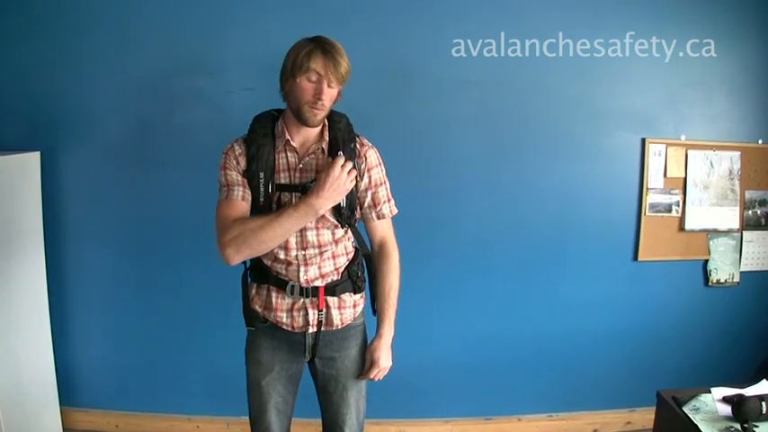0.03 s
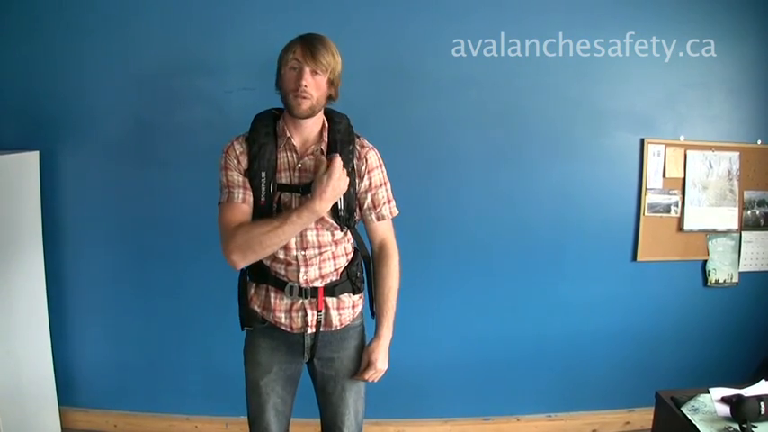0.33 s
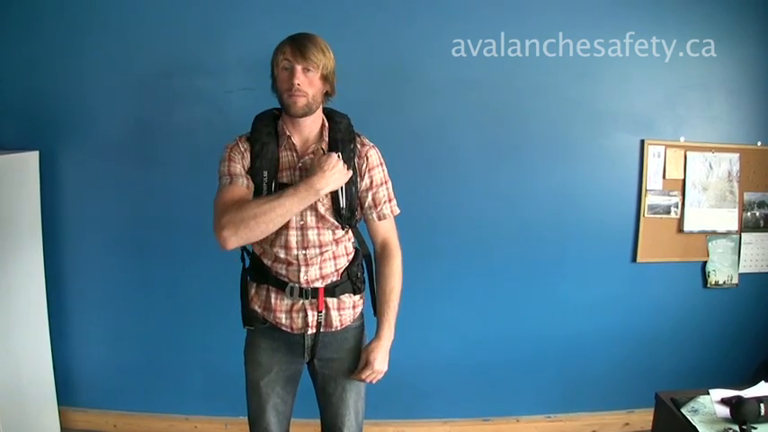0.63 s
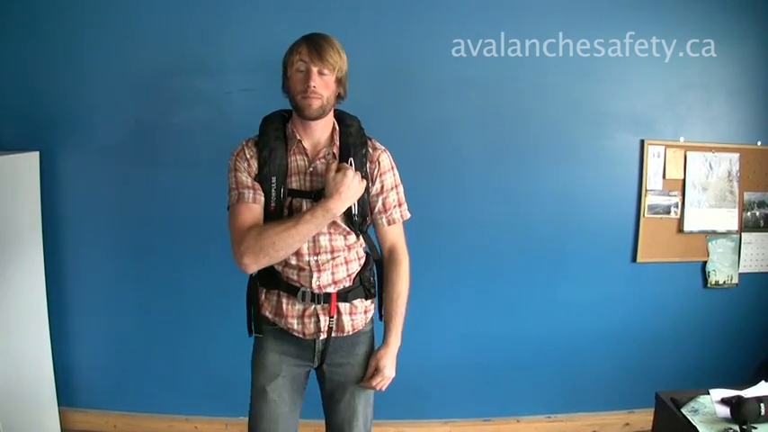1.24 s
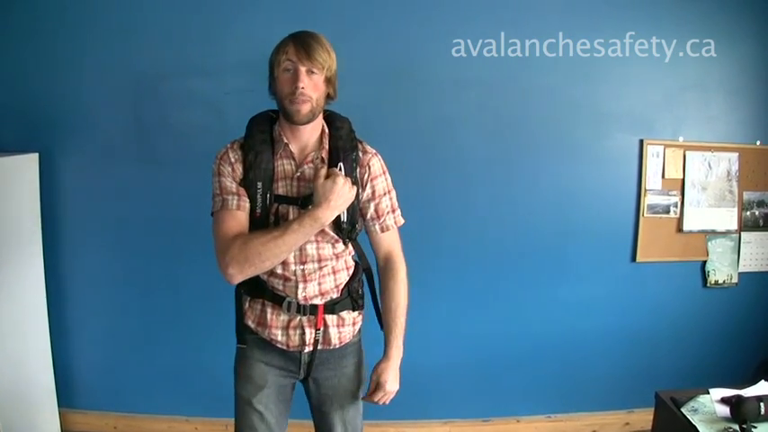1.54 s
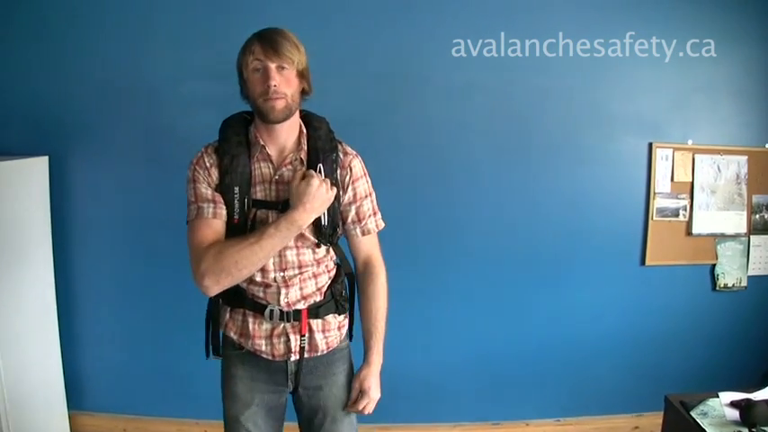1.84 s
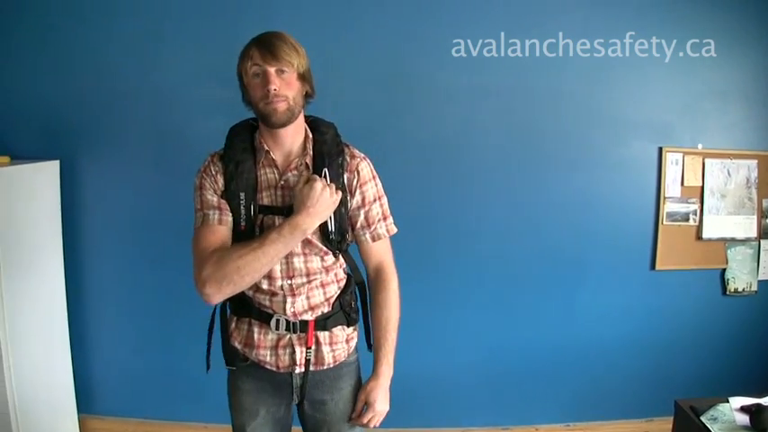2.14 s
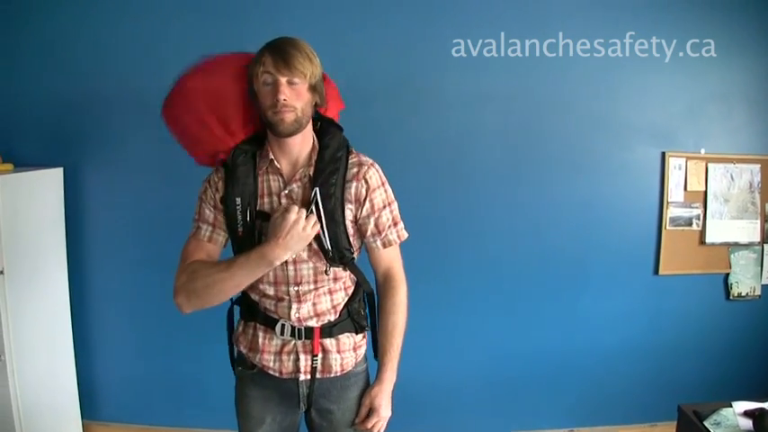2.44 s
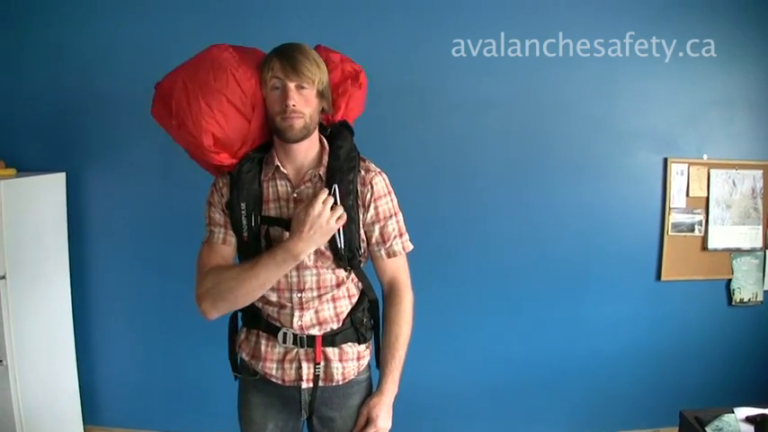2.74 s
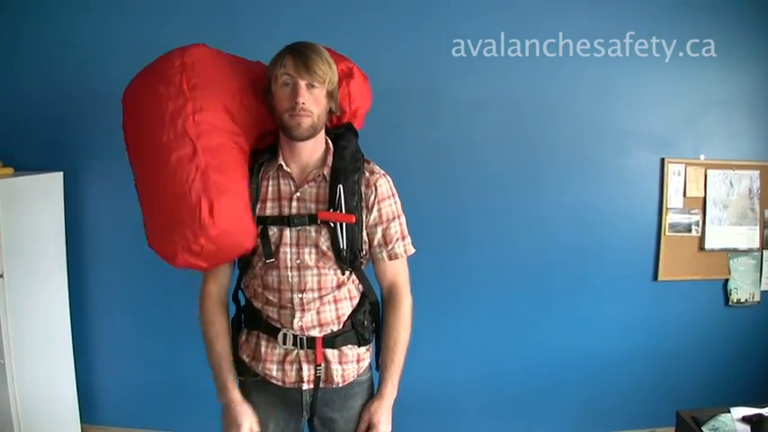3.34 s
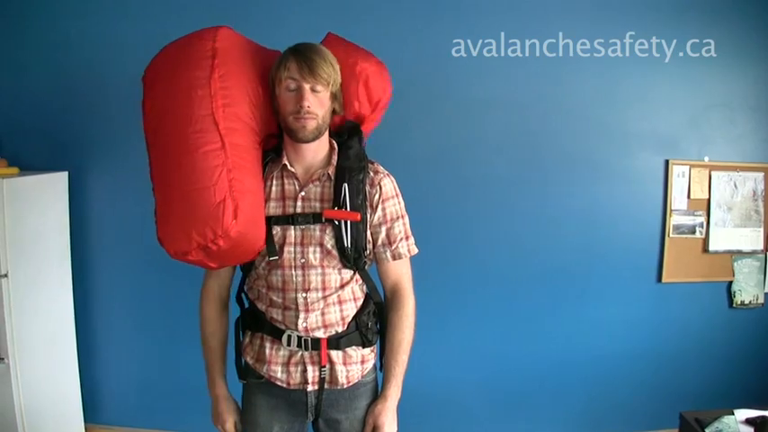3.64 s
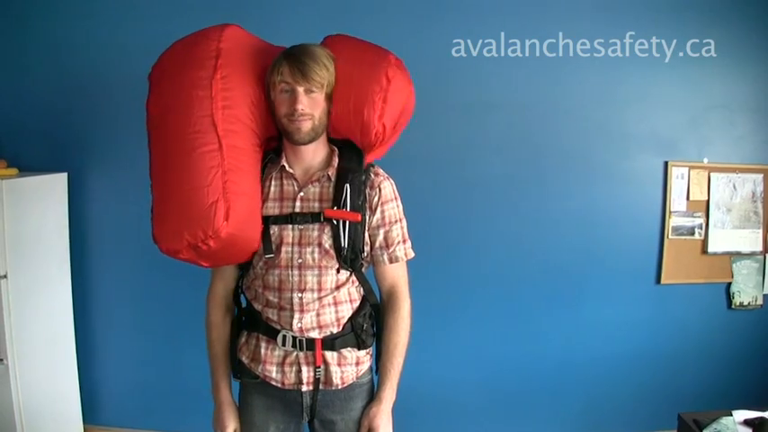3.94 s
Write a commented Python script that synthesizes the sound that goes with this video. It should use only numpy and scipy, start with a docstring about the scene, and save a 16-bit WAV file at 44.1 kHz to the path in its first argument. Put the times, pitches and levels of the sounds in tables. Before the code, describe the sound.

Quiet strap rustles, then a backpack airbag thumps open and inflates with a loud hiss.

```python
"""A quiet room with buzzing lights, where an avalanche backpack fires. Straps rustle and the handle knocks; the
trigger cable is pulled, rubbing and then scraping in its sleeve. The pack bursts open with two thumps, the
first hard enough to clip, and gas rushes into the bags: the jet hisses on while the hollow resonance rises and
the low roar fades as they fill."""
import sys
import numpy as np
from scipy import signal
from scipy.fft import rfft, irfft, next_fast_len
from scipy.io import wavfile
from scipy.ndimage import uniform_filter1d, map_coordinates

SR = 44100
rng = np.random.default_rng(int(sys.argv[2]) if len(sys.argv) > 2 else 0)


def to_wav(s):
    """Save 16-bit WAV."""
    ch = np.atleast_2d(s).T  # columns
    pcm = np.round(np.clip(ch, -1, 1) * 32767)  # PCM
    wavfile.write(sys.argv[1], SR, pcm.astype(np.int16))


N = 176400
T = np.arange(N) / SR


def amp(db):
    """Decibels to gain."""
    return 10 ** (np.asarray(db) / 20)


def unit(x):
    """Scale to rms 1."""
    return x / np.sqrt(np.mean(x ** 2) + 1e-20)


def along(points, hz):
    """Read (Hz, value) points on a log frequency axis."""
    freqs, values = np.transpose(points)
    return np.interp(np.log(hz + 1), np.log(freqs + 1), values)


def curves(rows):
    """One automation curve for each column after the time."""
    times, *columns = np.transpose(rows)
    return [np.interp(T, times, column) for column in columns]


def wobble(per_s):
    """A smooth random curve with per_s knots a second."""
    return map_coordinates(rng.standard_normal(2048), [T * per_s], mode="wrap")


def filtered(x, response):
    """EQ x by a gain that depends on frequency."""
    size = next_fast_len(N + SR // 2)
    return irfft(rfft(x, size) * response(np.fft.rfftfreq(size, 1 / SR)), size)[..., :N]


def low_cut(x, hz):
    """Cut the deep bass from the knocks and thumps."""
    return signal.sosfilt(signal.butter(4, hz, "high", fs=SR, output="sos"), x)


def noise(colour):
    """Coloured noise of rms 1."""
    return unit(filtered(rng.standard_normal(N), lambda hz: amp(along(colour, hz))))


def grains(colour, per_s):
    """Friction texture: tiny random slips through an EQ, rms 1."""
    slips = (rng.random(N) < per_s / SR) * rng.standard_normal(N)
    return unit(filtered(slips, lambda hz: amp(along(colour, hz))))


def resonance(centre_hz, width_hz):
    """Turbulence ringing in one resonance, which may glide."""
    a, b = filtered(rng.standard_normal((2, N)), lambda hz: 1 / (1 + (hz / width_hz) ** 2) ** 2)
    phase = 2 * np.pi * np.cumsum(centre_hz * np.ones(N)) / SR
    return unit(a * np.cos(phase) + b * np.sin(phase))


def burst(start, attack, hold, t60):
    """Attack, hold and exponential release, all in seconds."""
    rise = np.clip((T - start) / attack + .5, 0, 1) ** 2
    return rise * amp(-60 * np.clip((T - start - hold) / t60, 0, 2))


def ring(start, modes):
    """Damped modes set going by one blow."""
    age = np.clip(T - start, 0, .5)
    return sum(amp(db - 60 * age / t60) * np.sin(2 * np.pi * hz * age) for hz, db, t60 in modes)


# Reverb decay. Each row: frequency in Hz, t60 in seconds.
ROOM_DECAY = [(100, 0.2), (600, 0.23), (3000, 1), (14000, 0.27)]
def room(x, tail_db=-12.5, wall_db=-15):
    """Add six slaps off near walls and a short tail."""
    hz, t, spectrum = signal.stft(rng.standard_normal(SR // 2), SR, nperseg=256)
    tail = signal.istft(spectrum * amp(-60 * t / along(ROOM_DECAY, hz)[:, None]), SR, nperseg=256)[1]
    impulse = amp(tail_db) * tail / np.linalg.norm(tail)
    delays = (rng.uniform(.002, .02, size=6) * SR).astype(int)
    impulse[delays] += amp(wall_db) * rng.choice([-1, 1], size=6)
    return x + signal.fftconvolve(x, impulse)[:N]


# EQ of the room air. Each row: frequency in Hz, gain in dB.
AIR_COLOUR = [(20, -7), (32, 13), (45, -10), (65, 3), (95, -11.5), (160, 2), (270, 3.5), (400, -6),
              (900, -16), (1700, -13), (4000, -15), (7000, -19.5), (11000, -21.5), (16000, -28)]
def room_tone(air_db=-50, hum_db=-58, hum_hz=29.8):
    """A soft bed of air over a deep hum."""
    return amp(air_db) * noise(AIR_COLOUR) + amp(hum_db) * np.sin(2 * np.pi * hum_hz * T)


# Outline of the buzz. Each row: frequency in Hz, level of a harmonic there in dB.
BUZZ_LEVELS = [(120, -78), (1300, -69), (2000, -75), (3200, -74), (3800, -65), (4600, -74), (5300, -70),
               (6400, -80), (7500, -72.5), (8400, -83), (9200, -75), (10000, -78), (10700, -74.5),
               (11500, -87), (12800, -84), (15500, -94)]
TOP_HZ = 15850
def lights(buzz_hz=119.95, scatter_db=2.5):
    """Mains buzz: one cycle of uneven harmonics, looped."""
    hz = buzz_hz * np.arange(1, int(TOP_HZ / buzz_hz))
    gains = amp(along(BUZZ_LEVELS, hz) + scatter_db * rng.standard_normal(len(hz)))
    turn = np.linspace(0, 1, 4096)
    phases = np.outer(hz / buzz_hz, turn) + rng.random((len(hz), 1))
    cycle = gains @ np.sin(2 * np.pi * phases)
    return np.sqrt(2) * np.interp(T * buzz_hz % 1, turn, cycle)


# Cloth moves. Each row: peak time in seconds, half length in seconds, level in dB.
CLOTH_SWISHES = [(.01, 0.063, -48.5), (0.211, 0.012, -43), (0.265, 0.15, -52), (0.61, .1, -49.5),
                 (.69, .008, -50), (.935, 0.0066, -50), (1.148, .035, -49), (1.271, 0.024, -48.5),
                 (1.337, 0.034, -47.5), (1.572, .004, -45), (1.608, 0.03, -44.5), (1.754, 0.04, -52),
                 (1.822, 0.036, -51), (2.044, 0.03, -37.5), (2.345, 0.052, -40.5)]
# Bright cloth EQ. Each row: frequency in Hz, gain in dB.
CLOTH_COLOUR = [(200, -10), (700, -8.5), (2000, 4.5), (4000, 1.5), (6500, -7.5), (10000, -12.5),
                (16000, -30)]
CRINKLES_PER_S = 2800
def cloth():
    """Fabric crinkles in short, soft swishes."""
    power = sum(amp(db) ** 2 / (1 + ((T - peak) / half) ** 2 / 2) ** 4 for peak, half, db in CLOTH_SWISHES)
    return np.sqrt(power) * grains(CLOTH_COLOUR, CRINKLES_PER_S)


# Fader ride of the dull rub: the straps, and the cable being pulled just after 2 s. Each row: time in seconds,
# level in dB.
RUB_RIDE = [(0, -49), (.13, -51), (.24, -45), (.35, -50.5), (.7, -52.5), (.8, -58), (1.15, -53.5),
            (1.4, -50.5), (1.53, -52.5), (1.6, -47.5), (1.68, -55.5), (1.79, -47.5), (1.9, -58),
            (1.99, -55), (2.01, -38), (2.06, -39), (2.13, -59), (2.26, -50), (2.33, -41), (2.5, -32)]
# Dull rub EQ. Each row: frequency in Hz, gain in dB.
RUB_COLOUR = [(80, -30), (250, -2.5), (400, 1.5), (700, -1), (1300, -4), (2200, -27), (8000, -43)]
def rubs():
    """The straps rub with a dull, grainy rustle; the loud rub just after 2 s is the trigger cable being pulled."""
    return amp(curves(RUB_RIDE)[0]) * grains(RUB_COLOUR, CRINKLES_PER_S)


# Handle and buckle hits. Each row: start in seconds, level in dB.
HANDLE_HITS = [(.209, -22), (.69, -46), (1.241, -42), (1.33, -41), (1.566, -43), (1.722, -43), (1.765, -38),
               (1.997, -31), (2.004, -32), (2.013, -31), (2.315, -32.5)]
# EQ of the clack. Each row: frequency in Hz, gain in dB.
CLACK_COLOUR = [(100, -74), (300, -10), (450, 6), (750, -3.5), (1100, -15.5), (2000, -12), (4500, -14.5),
                (9000, -33), (16000, -40)]
# Ring of the handle. Each row: pitch in Hz, gain in dB, t60 in seconds.
HANDLE_RING = [(464, -7.5, 0.02), (664, 4, .018)]
def handle(clack_db=-5):
    """Handle and buckles knock: a brief ring under a noisy clack."""
    clack = amp(clack_db) * noise(CLACK_COLOUR)
    knocks = sum(amp(db) * (ring(start, HANDLE_RING) + clack * burst(start, .0013, hold=.0015, t60=.027))
                 for start, db in HANDLE_HITS)
    return low_cut(knocks, hz=330)


# Fader ride of the pull. Each row: time in seconds, level in dB.
CABLE_RIDE = [(2.06, -75), (2.074, -37), (2.084, -26), (2.094, -39), (2.125, -37), (2.135, -44.5),
              (2.2, -48), (2.225, -53), (2.36, -65), (2.4, -93)]
# Thin scrape EQ. Each row: frequency in Hz, gain in dB.
SCRAPE_COLOUR = [(800, -22), (2300, -9), (2850, 0), (3600, -2.5), (4600, -10), (6000, -19), (14000, -46)]
def cable():
    """The trigger cable sticks and slips in its sleeve."""
    return amp(curves(CABLE_RIDE)[0]) * grains(SCRAPE_COLOUR, per_s=3800)


# The pack bursting. Each row: start in seconds, level in dB, then attack, hold and t60 in seconds.
PACK_HITS = [(2.372, 14, .013, .006, .085), (2.426, 12.5, .004, .008, .09)]
# EQ of the blast. Each row: frequency in Hz, gain in dB.
BLAST_COLOUR = [(25, -31), (90, -27), (130, -11), (190, -14), (500, 2.5), (850, 2), (1300, -1.5),
                (2400, -2.5), (4000, -16.5), (7000, -25.5), (16000, -32)]
# Boom of the pack. Each row: pitch in Hz, gain in dB, t60 in seconds.
PACK_BOOM = [(205, -8, .09), (280, -9, .08), (920, -11, .04)]
def thumps():
    """Each side of the pack is blown open: a blast of air and a short boom."""
    blast = noise(BLAST_COLOUR)
    pops = sum(amp(db) * (blast * burst(start, attack, hold, t60) + ring(start, PACK_BOOM))
               for start, db, attack, hold, t60 in PACK_HITS)
    return low_cut(pops, hz=155)


def unfolding(x, depth_db=1.0, patch_hz=350, patch_s=.12):
    """The colour shifts in slow random patches as the fabric unfolds."""
    hz, t, spectrum = signal.stft(x, SR, nperseg=512)
    patches = uniform_filter1d(rng.standard_normal(spectrum.shape), round(patch_hz / hz[1]), axis=0)
    patches = uniform_filter1d(patches, round(patch_s / t[1]), axis=1)
    return unit(signal.istft(spectrum * amp(depth_db * unit(patches)), nperseg=512)[1][:N])


# Breathy notes. Each row: start and end in seconds, pitch and width in Hz, level in dB.
BAG_TONES = [(3.58, 4.05, 1240, 65, -9.5), (3.17, 3.32, 2200, 110, -8.5), (3.36, 3.54, 4860, 90, -10),
             (3.19, 3.35, 3700, 550, -5), (2.6, 3.28, 470, 80, -12), (2.43, 2.59, 1350, 120, -2.5)]
def bag_tones(fade_s=.06):
    """Airy tones come and go as the bags change shape."""
    return sum(amp(db) * np.clip(np.minimum(T - start, end - T) / fade_s, 0, 1) * resonance(hz, width)
               for start, end, hz, width, db in BAG_TONES)


# Fader rides of the jet. Each row: time in seconds, roar level in dB, hiss level in dB.
JET_RIDE = [(2.365, -29, -26), (2.385, 6, -2), (2.42, 4, -4), (2.44, 2, 3), (2.49, 2.5, -1),
            (2.6, 2.5, 2.5), (2.95, 0.5, 4.5), (3.1, 0.5, 4), (3.24, -2.5, 5), (3.34, -2.5, 3.5),
            (3.5, -4.5, 4), (3.75, -5, 4), (4, -4.5, 3.5)]
# EQs of the full roar and the bright hiss. Each row: frequency in Hz, gain in dB.
ROAR_COLOUR = [(30, -57), (90, -37), (170, -19), (290, -5), (370, -5), (470, 0.5), (560, 0), (680, -0.5),
               (900, 1.5), (1070, 3), (1300, 4), (2200, 1.5), (4000, -0.5), (16000, -59)]
HISS_COLOUR = [(60, -62), (250, -20), (700, -12.5), (1050, -18), (1400, -3.5), (1800, -6), (2200, 0.5),
               (2700, -0.5), (3700, 1), (4300, -1), (5000, -0.5), (6800, -4.5), (8800, -4.5), (11000, -10),
               (13000, -15.5), (16000, -23.5)]
# Hollow resonance of the bags. Each row: time in seconds, pitch in Hz, level in dB.
HOLLOW_SWEEP = [(2.365, 1105, -11), (2.39, 1205, 2), (2.415, 1200, 0), (2.46, 1550, -2), (2.5, 1400, -3.5),
                (2.56, 1950, -2), (2.65, 2300, -8), (2.8, 2490, -21), (3.1, 2600, -34)]
def gas(valve_s=2.367, opening_s=.0016, waver_db=.84, flutter_db=.3):
    """The jet roars, hisses and rings the space inside the bags; only roar and ring get reverb."""
    roar_db, hiss_db = curves(JET_RIDE)
    hollow_hz, hollow_db = curves(HOLLOW_SWEEP)
    roar = amp(roar_db + waver_db * wobble(per_s=21.91)) * noise(ROAR_COLOUR)
    hiss = amp(hiss_db) * unfolding(noise(HISS_COLOUR))
    hollow = amp(hollow_db) * resonance(hollow_hz, width_hz=310)
    tones = bag_tones()
    valve = np.clip((T - valve_s) / opening_s, 0, 1)
    flow = valve * amp(flutter_db * wobble(per_s=25))
    return room(flow * (roar + hollow)) + flow * (hiss + tones)


def scene(mic_hiss_db=-70.5):
    """Everything sits dead centre; each microphone adds its own hiss."""
    pack = room(handle() + rubs() + cloth() + cable() + thumps())
    centre = pack + gas() + lights() + room_tone()
    return centre + amp(mic_hiss_db) * rng.standard_normal((2, N))


def record(dry):
    """The gain control ducks a moment too late, so the first thump clips; then the top is cut off."""
    threshold_db, max_duck_db = -24, 23
    follow = lambda x, lag_s: signal.lfilter([1 / (lag_s * SR)], [1, 1 / (lag_s * SR) - 1], x)
    level_db = 10 * np.log10(follow(dry[0] ** 2, lag_s=.003) + 1e-12)
    duck_db = follow(np.clip(level_db - threshold_db, 0, max_duck_db), lag_s=.008)
    ducked = dry * amp(-duck_db)
    clipped = ducked / (1 + np.abs(ducked) ** 6) ** (1 / 6)  # soft clip at full scale
    return filtered(clipped, lambda hz: hz < TOP_HZ)


dry = scene()
out = record(dry)
to_wav(out)
```